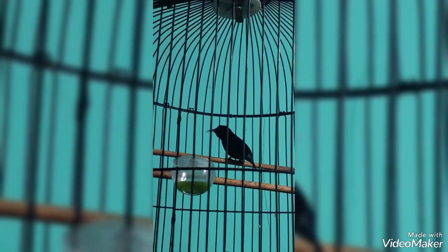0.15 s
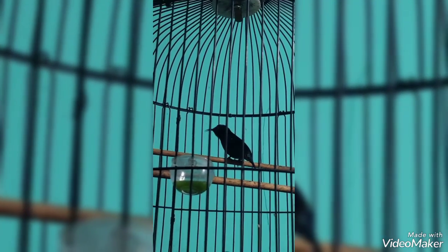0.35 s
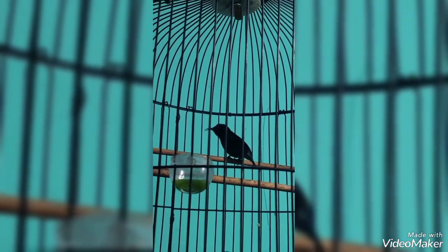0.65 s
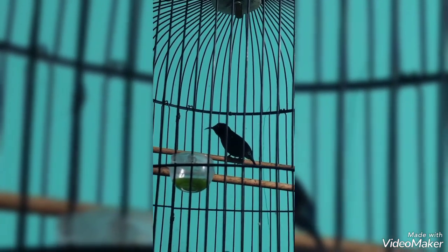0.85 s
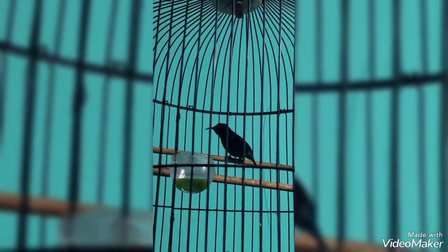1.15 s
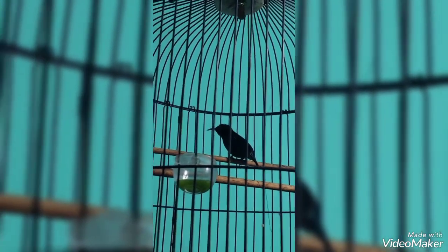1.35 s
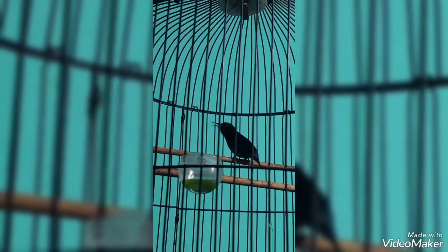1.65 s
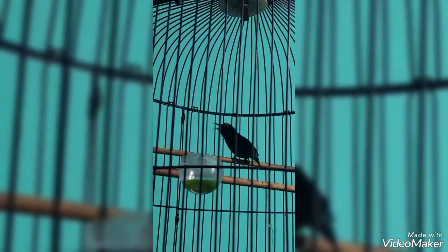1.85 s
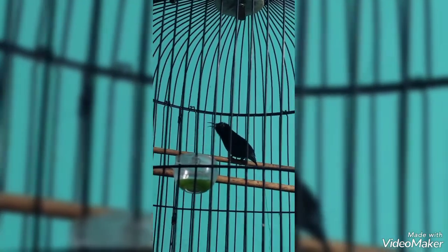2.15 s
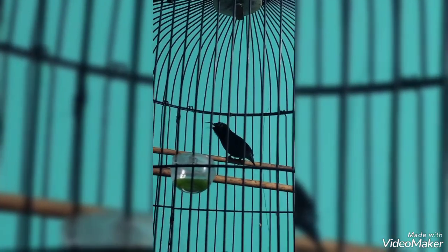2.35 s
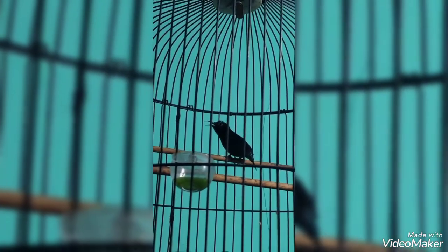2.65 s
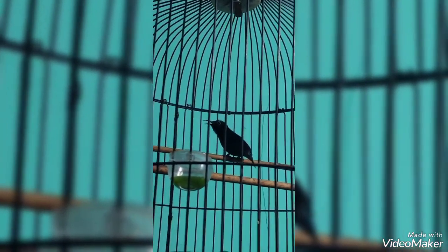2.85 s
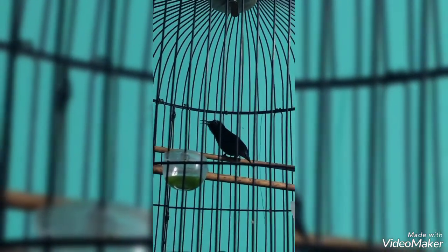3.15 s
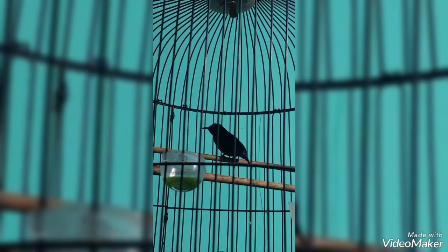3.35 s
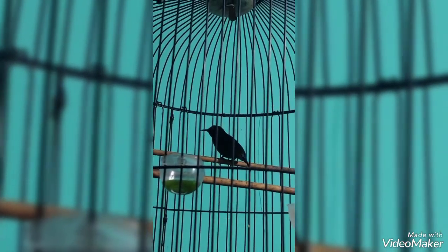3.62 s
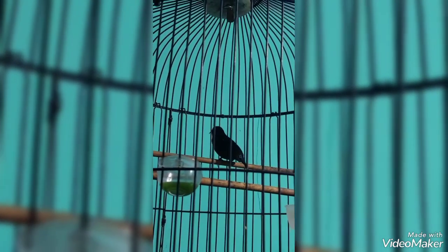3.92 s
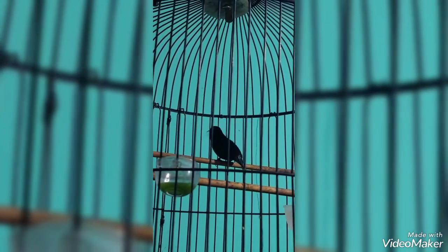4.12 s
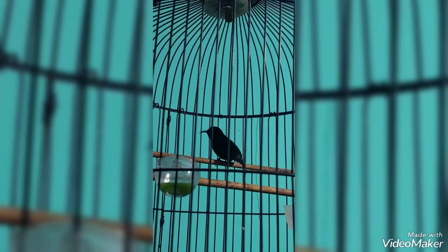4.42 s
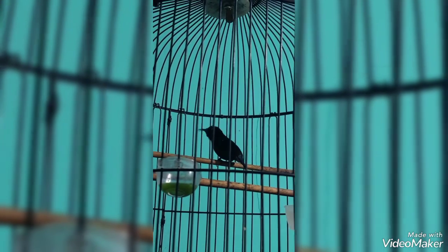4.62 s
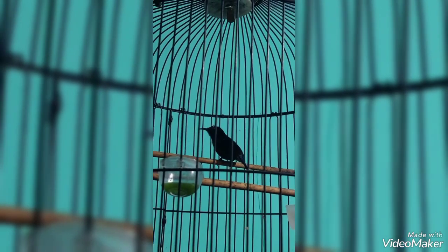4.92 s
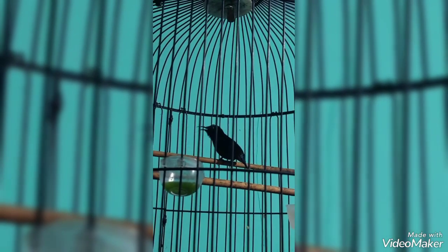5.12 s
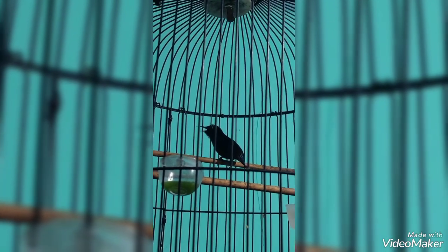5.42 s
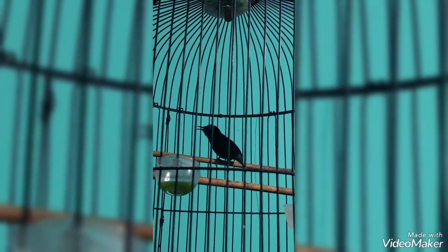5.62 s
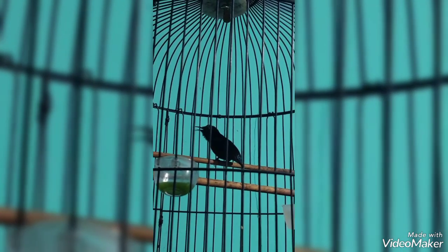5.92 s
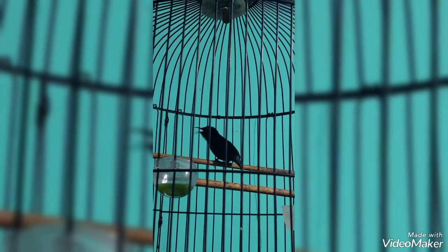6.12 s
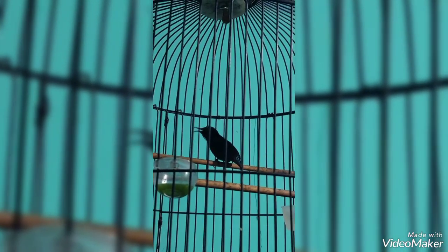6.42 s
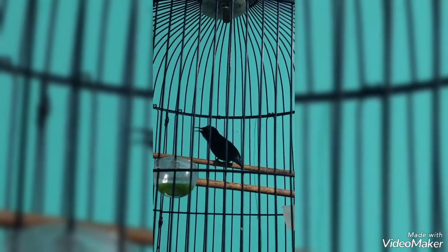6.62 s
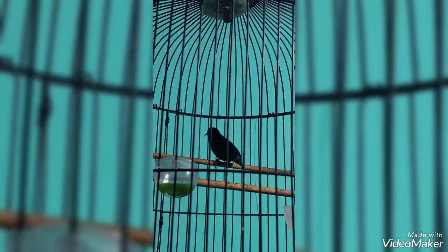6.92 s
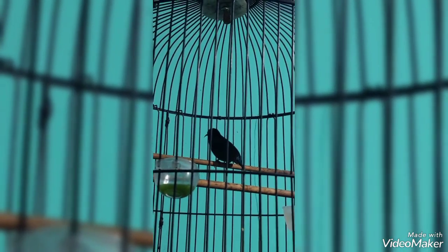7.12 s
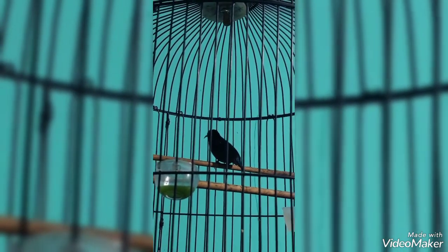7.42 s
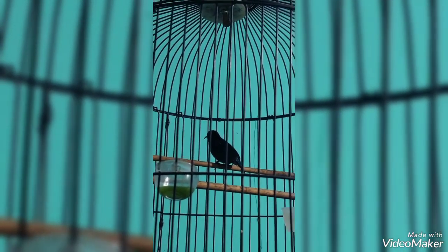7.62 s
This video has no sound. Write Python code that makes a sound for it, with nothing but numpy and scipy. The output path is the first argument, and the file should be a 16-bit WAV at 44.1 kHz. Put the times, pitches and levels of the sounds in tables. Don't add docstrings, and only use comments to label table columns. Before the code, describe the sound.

A small caged bird sings close to a phone in a bare, echoing room. Three sharp chips open, then one harsh call drops quickly from high to low. A fast, even trill of whistled, sliding notes follows, then three spaced chips, a second similar trill and a last lone chip. Faint hum and hiss run underneath; loud notes sound gritty and slightly overloaded.

```python
import sys
import numpy as np
from scipy import signal
from scipy.fft import rfft, irfft, next_fast_len
from scipy.io import wavfile
from scipy.ndimage import uniform_filter1d, minimum_filter1d

SR = 44100
rng = np.random.default_rng(int(sys.argv[2]) if len(sys.argv) > 2 else 0)


def invert_db(x):
    u = np.asarray(x, float) / 20
    return 10 ** u


def to_wav(s):
    ch = np.atleast_2d(s).T
    pcm = np.round(np.clip(ch, -1, 1) * 32767)
    wavfile.write(sys.argv[1], SR, pcm.astype(np.int16))


N = 342657


def unit(x):
    return x / np.sqrt(np.mean(np.abs(x) ** 2) + 1e-20)


def along(points, hz):
    f, v = np.transpose(points)
    return np.interp(np.log(hz + 1), np.log(f + 1), v)


def filtered(x, response):
    m = next_fast_len(N + 8192)
    return irfft(rfft(x, m) * response(np.fft.rfftfreq(m, 1 / SR)), m)[..., :N]


def coloured_noise(points, channels=None):
    white = rng.standard_normal(N if channels is None else (channels, N))
    return unit(filtered(white, lambda hz: invert_db(along(points, hz))))


def blurred(x, down, across):
    return uniform_filter1d(uniform_filter1d(x, size=down, axis=-2), size=across, axis=-1)


# frequency in Hz, level in dB per Hz.
AIR = [(20, -41), (30, -17), (70, -1), (180, -12.5), (390, -13), (850, -19), (2200, -20), (2900, -35.5),
       (4300, -34), (5600, -35.5), (7000, -80.5)]
# frequency in Hz, likeness from 0 to 1.
ALIKE = [(60, .6), (300, 0.7), (1400, 0.061), (5000, 0.18)]
# frequency in Hz, level in dB.
HISS = [(4000, -30), (5600, -31.5), (6500, -17.5), (7000, -6.5), (7800, -2), (8100, -30.5), (15500, -38.5),
        (16000, -56.5)]


def room_tone():
    half_angle = lambda hz: np.arccos(np.clip(along(ALIKE, hz), -1, 1)) / 2
    split = lambda hz: invert_db(along(AIR, hz)) * [np.cos(half_angle(hz)), np.sin(half_angle(hz))]
    mid, side = filtered(rng.standard_normal((2, N)), split)
    air = unit(np.array([mid + side, mid - side]))
    lull_s, half_s, edge_s = 2.6, 1.6, 0.2
    lull = np.clip(.5 + (half_s - np.abs(np.arange(N) / SR - lull_s)) / edge_s, 0, 1)
    level_db = -61.5 - 3 * lull
    white = rng.standard_normal(N) + 0.39 * rng.standard_normal((2, N))
    hiss = unit(filtered(white, lambda hz: invert_db(along(HISS, hz))))
    return invert_db(level_db) * air * invert_db([[1.2], [-1.2]]) + invert_db(-61) * hiss


def voice(rows, partials, rough=0.):
    s, hz, db = np.transpose(rows)
    t = np.arange(int(s[-1] * SR)) / SR
    drift = uniform_filter1d(uniform_filter1d(rng.standard_normal(4096), size=70), size=50)
    flutter = unit(drift)[np.arange(len(t)) % 4096]
    phase = 2 * np.pi * np.cumsum(np.interp(t, s, hz) * (1 + rough * flutter)) / SR
    return invert_db(np.interp(t, s, db)) * sum(invert_db(level) * np.sin(k * phase) for k, level in partials)


# frequency in Hz, time to fall 60 dB in seconds.
ROOM = [(3000, 0.4), (5000, 0.37), (8000, 0.36), (15000, 0.35)]
# delay in seconds, level in dB.
WALLS = [
    (.0045, -5.5),
    (.011, -13),
    (.0215, -17),
    (.034, -25.5),
    (.045, -28),
]


def add(mix, s, note, wet_db, pan_db=0.):
    hz, t, z = signal.stft(rng.standard_normal((2, SR // 2)), SR, nperseg=256)
    decay = invert_db(-60 * t / along(ROOM, hz)[:, None]) + invert_db(-51 - 31 * t)
    tail = signal.istft(z * decay, SR, nperseg=256)[1]
    tail = tail * np.clip(np.arange(tail.shape[1]) / (0.017 * SR), 0, 1)
    tail = invert_db(wet_db) * tail / np.linalg.norm(tail[0])
    bright = signal.cheby1(4, .5, 6000, "high", fs=SR)
    tail = tail - 0.24 * signal.filtfilt(*bright, tail)
    tail[:, 0] = 1
    scatter = rng.uniform(-1.2, 1, (len(WALLS), 2))
    for (lag, db), ear in zip(WALLS, scatter):
        tail[[0, 1], np.round((lag + .0006 * ear) * SR).astype(int)] += invert_db(db)
    at = round(s * SR)
    heard = signal.fftconvolve(note[None], tail, axes=1)[:, :N - at]
    mix[:, at:at + heard.shape[1]] += heard * invert_db([[pan_db / 2], [-pan_db / 2]])


def earlier_chip(mix):
    rows = [(0, 5240, -2), (.01, 4900, -10), (.02, 4700, -27)]
    add(mix, 0, invert_db(-33.0) * voice(rows, [(0.99, 0)]), wet_db=11.0)


# start in seconds, peak in dB, pitch in Hz, second voice in dB, left over right in dB.
CHIPS = [
    (0.043, -11, 4940, -38, 0.5),
    (0.237, -10, 4940, -24, -0.5),
    (0.412, -10, 5044, -25.5, -2),
    (3.847, -13, 5022, -38.5, -0.5),
    (4.2399, -11, 5104, -46, 1),
    (4.6818, -11, 5056, -42.5, -1),
    (7.464, -12.5, 5018, -35, 0),
]
# multiple of the pitch, level in dB.
CHIP_PARTIALS = [(1, -0.5), (1.419, -41), (2.067, -32.5), (2.84, -45)]
# frequency in Hz, level in dB.
SPLASH = [(2000, -22), (3000, -21), (4300, 1), (6000, 6.5), (8500, 1), (9000, -31)]


def chips(mix):
    breath = coloured_noise(SPLASH)
    length_s, scoop = .035, .86
    for s, db, hz, side_db, pan_db in CHIPS:
        rows = [(0, scoop * hz, -40), (.004, .97 * hz, -12), (.007, hz, -3), (0.36 * length_s, 1.01 * hz, 0),
                (length_s, .995 * hz, -4), (length_s + 0.018, 0.99 * hz, -40)]
        note = voice(rows, CHIP_PARTIALS, rough=0.013)
        note = note + voice(rows, [(1.235, side_db)], rough=.008)
        fade = invert_db(-60 * np.arange(len(note)) / SR / 0.18)
        puff = breath[round(s * SR):][:len(note)] * fade
        add(mix, s - .007, invert_db(db - 1) * (note + invert_db(-31) * puff), wet_db=1.0, pan_db=pan_db)


# time in seconds, pitch in Hz, level in dB.
HARSH = [
    (0.8144, 6890, -58.5),
    (0.818, 6763, -32),
    (0.837, 6720, -34.5),
    (0.845, 6405, -16),
    (0.867, 6050, -10),
    (0.879, 5230, -24.5),
    (0.901, 4370, -45),
    (.915, 3960, -62.5),
]


def harsh_call(mix):
    start_s = HARSH[0][0]
    call = np.array(HARSH) - [start_s, 0, 0]
    steep = call * [1, 0, 1.6]
    rasp = invert_db(-24.5) * voice(steep + [0, 14900, 0], [(0.99, 0.0017)], rough=0.03)
    rasp += invert_db(-19.5) * voice(steep + [0, 11950, 0], [(0.98, 0.0076)], rough=0.001)
    rasp += invert_db(-4.0) * voice(call * [1, 0, 1] + [0, 6740, 0], [(0.99, 0.0036)], rough=.007)
    add(mix, start_s, voice(call, [(0.98, 0)], rough=0.039) + rasp, wet_db=5.5)


def smear(note, length):
    burst = rng.standard_normal(2048)[:round(length * SR)]
    return signal.fftconvolve(note, burst / np.linalg.norm(burst))


# start in seconds, whistle peak in dB, whistle pitch in Hz.
TRILL_A = [(1.6643, -11, 5560), (1.7402, -7.5, 5474), (1.813, -10, 5620), (1.8942, -7.5, 5470),
           (1.9797, -10, 5540), (2.0612, -10.5, 5403), (2.1487, -12, 5460), (2.232, -10.5, 5270),
           (2.3177, -11, 5370), (2.397, -12, 5215), (2.4836, -12, 5216), (2.5756, -9, 5463),
           (2.6646, -11.5, 5205), (2.7516, -12, 5330), (2.8402, -13.5, 5130), (2.9297, -11, 5300),
           (3.0274, -11, 5422), (3.1184, -12, 5285), (3.2067, -12, 5360), (3.3087, -20, 4950)]
# start in seconds, whistle peak in dB, whistle pitch in Hz.
TRILL_B = [(5.1211, -11, 5263), (5.2006, -8, 5465), (5.279, -8.5, 5566), (5.3564, -9.5, 5425),
           (5.4386, -8, 5510), (5.5302, -11.5, 5330), (5.6112, -10.5, 5302), (5.6939, -12.5, 5404),
           (5.7872, -10.5, 5240), (5.873, -13, 5156), (5.9693, -11, 5360), (6.059, -11.5, 5213),
           (6.1486, -11.5, 5215), (6.248, -12.5, 5257), (6.3311, -13, 5424), (6.4157, -12, 5255),
           (6.5073, -11, 5294), (6.5927, -13, 5240), (6.6759, -12, 5380), (6.7664, -13, 5204),
           (6.8658, -11, 5402)]
# multiple of the pitch, level in dB.
WHISTLE_PARTIALS = [(1, 1.5), (2, -37), (3, -35.5)]
# share of its length, pitch in Hz, level in dB.
SLIDE = [(0, 4418, -20.5), (0.153, 4125, -3), (0.499, 3637, -5.5), (0.751, 3400, -4.5),
         (1.001, 3345, -26.5)]
# multiple of the pitch, level in dB.
SLIDE_PARTIALS = [(1, -21.5), (2, 1), (3, -31.5), (4, -27.5)]
# frequency in Hz, level in dB.
BUZZ = [(3100, -40), (3400, -2), (4400, -1), (5400, 6), (5750, -12), (5950, -53)]


def trills(mix):
    buzz = coloured_noise(BUZZ)
    slide_rows = np.array(SLIDE) * [.026, 1, 1]
    slide_lag_s = .0175
    for s, db, hz in TRILL_A + TRILL_B:
        rows = [(0, .95 * hz, -17.5), (.005, .985 * hz, -10.5), (.011, 1.01 * hz, 1.5), (.017, hz, -3.5),
                (.023, 0.67 * hz, -30.5)]
        whistle = invert_db(db - 4.0) * voice(rows, WHISTLE_PARTIALS, rough=0.011)
        fall_rows = [(0, hz, -3), (.006, .94 * hz, 1), (.013, 0.92 * hz, -17.5), (.016, .8 * hz, -32)]
        fall = invert_db(db - 14) * voice(fall_rows, [(0.97, 0.0048)], rough=0.029)
        slide_db = min(-7, db + 4)
        slide = invert_db(slide_db) * voice(slide_rows, SLIDE_PARTIALS, rough=.024)
        slide[:len(fall)] += fall
        note = np.pad(smear(slide, length=.011), (round(slide_lag_s * SR), 0))
        note[:len(whistle)] += whistle
        air = buzz[round(s * SR):][:len(note)]
        note += invert_db(db - 21) * air * np.hanning(len(note)) ** .5
        add(mix, s - .007, note, wet_db=1.5)


def bird():
    mix = np.zeros((2, N))
    earlier_chip(mix)
    chips(mix)
    harsh_call(mix)
    trills(mix)
    return mix


def scene():
    return bird() + room_tone()


# frequency in Hz, level in dB.
CAPSULE = [(3000, -16), (5300, -5), (6500, 2.5), (9000, -5.5)]
# frequency in Hz, level in dB.
GRIT = [(150, -30), (400, -1), (1200, -0.5), (3200, -2.5), (3900, -27.5)]


def overload(x):
    thump_db = [(20, -27), (60, 4.5), (200, -2), (700, -12), (2300, -24.0), (2700, -47.0)]
    push = filtered(x, lambda hz: invert_db(along(CAPSULE, hz)))
    thump = filtered(push * push, lambda hz: invert_db(along(thump_db, hz)) * (hz > 9))
    loud = np.abs(uniform_filter1d(x * x, size=1500, axis=1)) ** 0.27
    grit = invert_db([[-51.5], [-48]]) * loud * coloured_noise(GRIT, 2)
    flattened = x / np.sqrt(1 + (x / 1.27) ** 2)
    return flattened + grit + thump * invert_db([[-15], [-11]])


# band number, start in seconds after the first note, length in seconds, dB over the noise.
TRILL_TONES = [(19, .15, .58, 15), (28, .3, .4, 17), (30, .03, .75, 16), (30, 1.38, .42, 17),
               (40, .03, .74, 18), (40, .95, .85, 18)]
# band number, start in seconds after it, length in seconds, dB over the noise.
CHIP_TONE = (30, -.01, .13, 16)
# band number, start in seconds, length in seconds, dB over the noise.
ODD_TONES = [(19, .78, .22, 19), (34, .83, .1, 18), (26, 1.72, .33, 17), (44, 1.69, .76, 18),
             (32, 2.15, .32, 22), (28, 2.94, .42, 17), (22, 3.95, .48, 13), (22, 4.73, 1., 14)]
# frequency in Hz, level in dB.
TREBLE = [(6000, 9), (8450, -11), (8750, -28.5), (9100, -3.5), (11200, 3), (11650, -53.5), (11950, 2),
          (12100, -7), (12550, -38.5), (12950, 2), (15400, 4.5), (15900, -52)]
# frequency in Hz, spread in dB.
PATCHY = [(6000, -0.5), (8400, 3), (9000, 3.5), (15000, 3)]
# frequency in Hz, likeness from 0 to 1.
TREBLE_ALIKE = [(6000, 1), (8500, 0.89), (10000, 0.67), (15000, 0.43)]


def tone_cues():
    cues = [(trill[0][0], *row) for trill in (TRILL_A, TRILL_B) for row in TRILL_TONES]
    cues += [(chip[0], *CHIP_TONE) for chip in CHIPS]
    return cues + [(0, *row) for row in ODD_TONES]


def rebuild_treble(x, tone_db=9):
    split_hz, tone_step_hz = 6755, 344.55
    hz, t, z = signal.stft(x, SR, nperseg=256)
    energy = blurred(np.abs(z) ** 2, 2, 6)
    held = np.minimum(np.arange(len(t)) // 6 * 6 + 3, len(t) - 1)
    lean_db = along([(9000, 0.14), (13000, 2.2)], hz)[:, None] * np.array([-1, 1])[:, None, None]
    size = np.sqrt(np.abs(energy[..., held])) * invert_db(along(TREBLE, hz))[:, None] * invert_db(lean_db)

    tiles = rng.standard_normal((len(hz) // 2 + 1, len(t) // 16 + 1))
    tiles = tiles.repeat(2, axis=0).repeat(16, axis=1)[:len(hz), :len(t)]
    share = np.clip(along(TREBLE_ALIKE, hz), 0, 1)[:, None]
    noise = unit(signal.stft(rng.standard_normal((3, N)), SR, nperseg=256)[2])
    fill = np.sqrt(share) * noise[0] + np.sqrt(1 - share) * noise[1:]
    fill = fill * invert_db(along(PATCHY, hz)[:, None] * tiles)

    tones = np.zeros_like(x)
    for cue, band, lag, lasts, over_db in tone_cues():
        tone_hz = (band + .5) * tone_step_hz
        start, stop = cue + lag, cue + lag + lasts
        k = np.argmin(np.abs(hz - tone_hz))
        span = np.arange(int(start * SR), int(stop * SR))
        gate = np.clip(np.minimum(t - start, stop - t) / 0.023, 0, 1)
        slow = uniform_filter1d(size[:, k], size=3, axis=1) * gate
        level = np.array([np.interp(span / SR, t, ear) for ear in slow])
        tones[:, span] += invert_db(tone_db) * level * np.sin(2 * np.pi * tone_hz * span / SR)
        fill[:, k - 2:k + 3] *= invert_db(-(over_db - 7.5) * gate * np.array([[.4], [.8], [1], [.8], [.4]]))

    treble = signal.istft(size * fill, SR, nperseg=256)[1][:, :N] + tones
    low = lambda f: np.clip((split_hz + 60 - f) / 120, 0, 1)
    high = lambda f: (1 - low(f)) * invert_db(along(TREBLE, f) / 2)
    return filtered(x + invert_db(-4.5) * tones, low) + filtered(treble, high)


# frequency in Hz, depth in dB.
KEPT = [(600, 68.5), (2500, 53.5), (3300, 74), (3900, 51), (6300, 38), (6600, 67), (8300, 70), (8800, 51)]


def drop_valleys(x, depth_db=6.5, under_db=13):
    hz, t, z = signal.stft(x, SR, nperseg=1024)
    level = 10 * np.log10(np.abs(blurred((np.abs(z) ** 2).mean(0), 4, 3)) + 1e-14)
    below, above = (-minimum_filter1d(-level, size=19, axis=0, origin=o) for o in (9, -9))
    valley = (level < np.minimum(below, above) - depth_db) & (hz > 5500)[:, None]
    foot = (level < above - under_db) & ((hz > 2750) & (hz < 3350))[:, None]
    masked = level < level.max(0) - along(KEPT, hz)[:, None]
    chance = unit(blurred(rng.standard_normal(level.shape), 9, 7))
    busy = level[(hz > 7000) & (hz < 8000)].mean(0) > -62
    exposed = (hz > 800) & (hz < 2900) | (hz > 8700)
    starved = (chance > 1.1) & busy & exposed[:, None]
    gain = np.where(valley | foot | masked | starved, invert_db(-23), 1)
    return signal.istft(z * gain, SR, nperseg=1024)[1][:, :N]


def low_pass(x):
    return signal.sosfilt(signal.butter(12, 16320, fs=SR, output="sos"), x)


def record(dry):
    rebuilt = rebuild_treble(overload(dry))
    limited = rebuilt / (1 + (rebuilt / .9) ** 4) ** (1 / 4)
    mix = drop_valleys(limited)
    return low_pass(mix)


dry = scene()
out = record(dry)
to_wav(out)
```